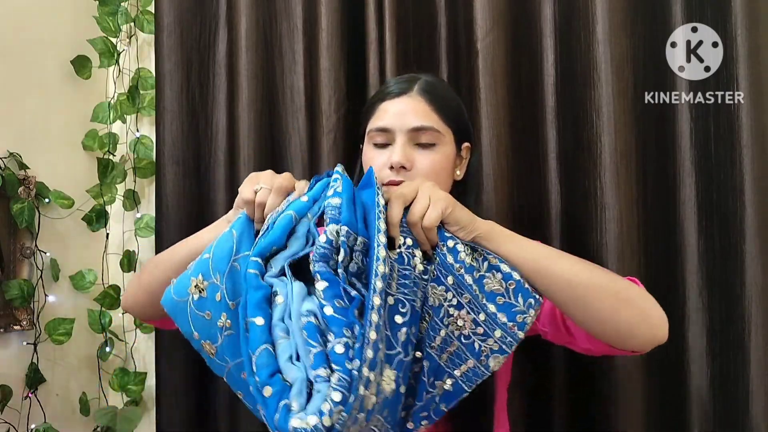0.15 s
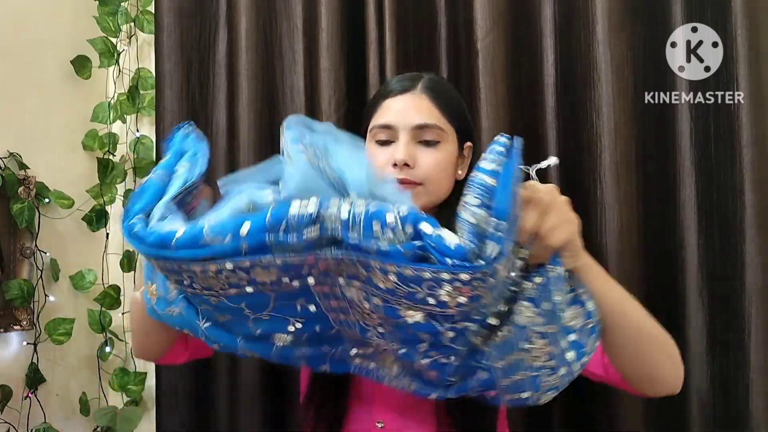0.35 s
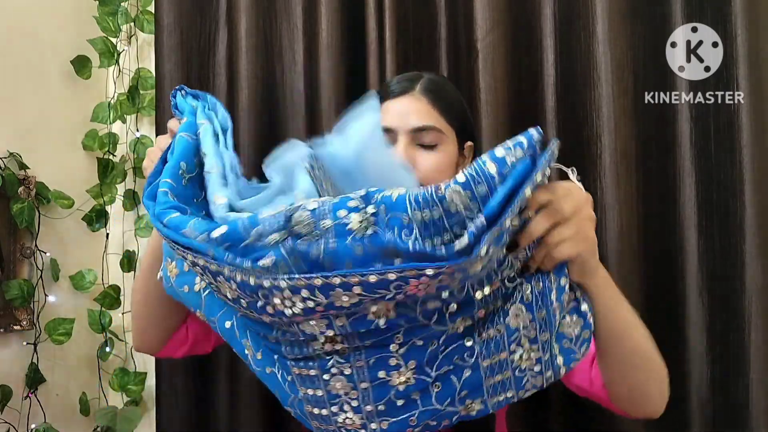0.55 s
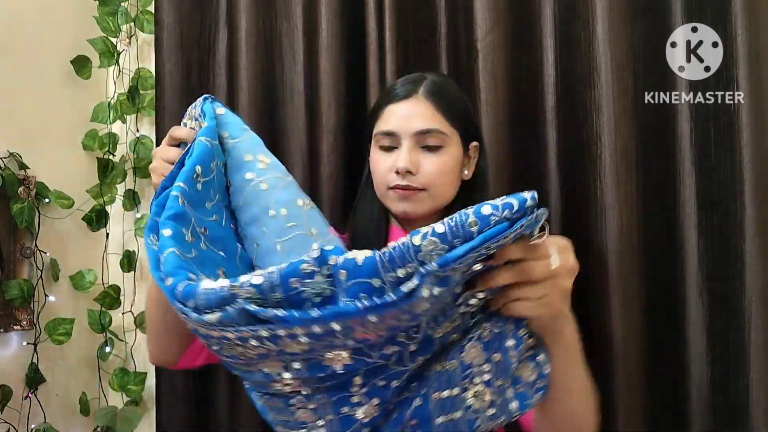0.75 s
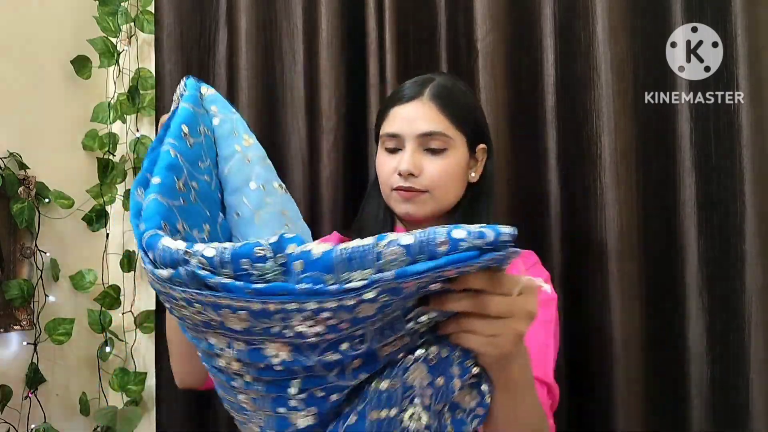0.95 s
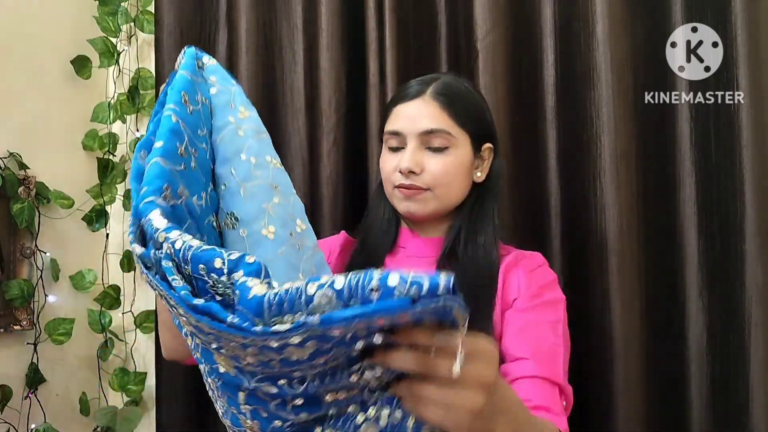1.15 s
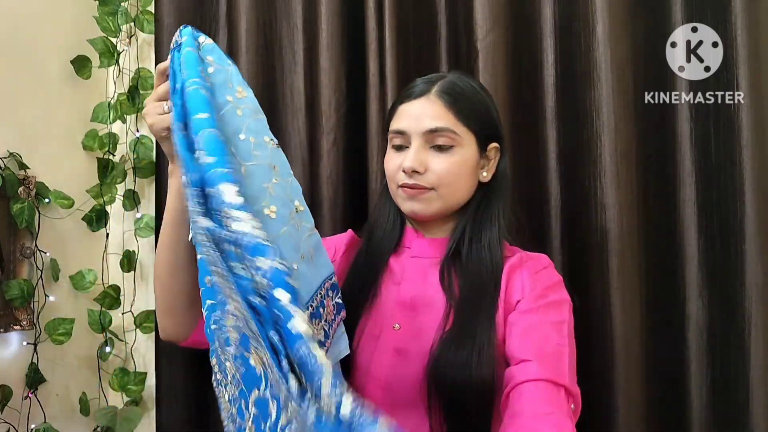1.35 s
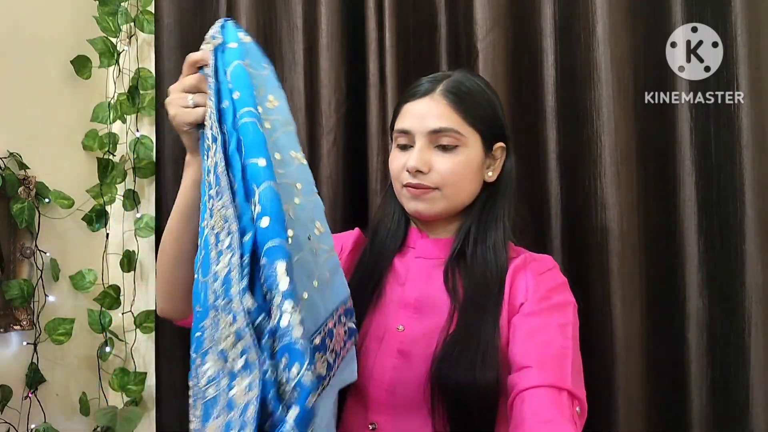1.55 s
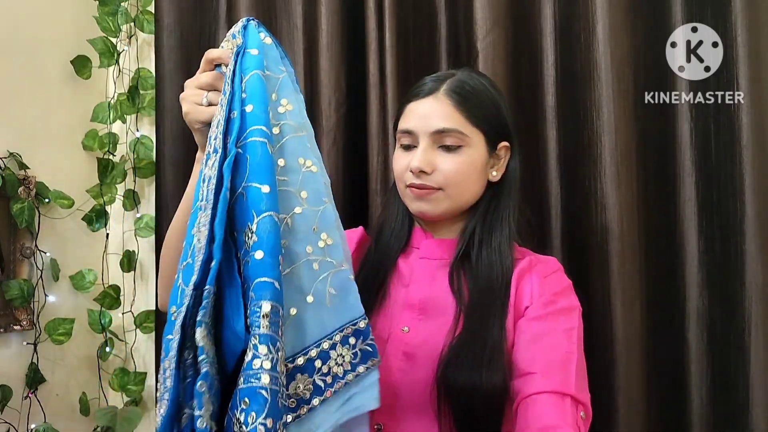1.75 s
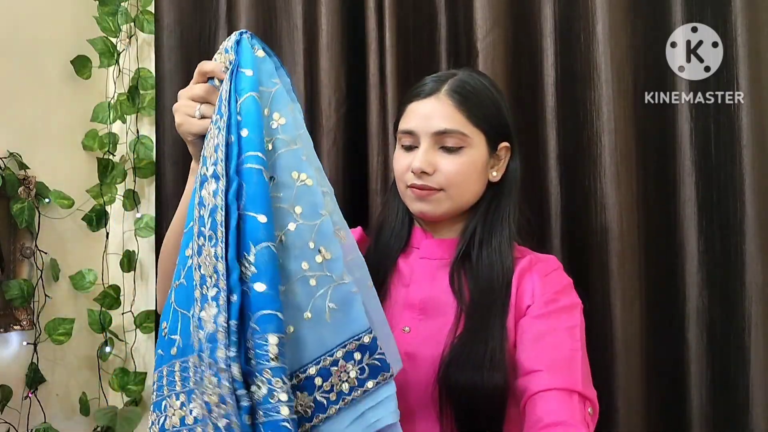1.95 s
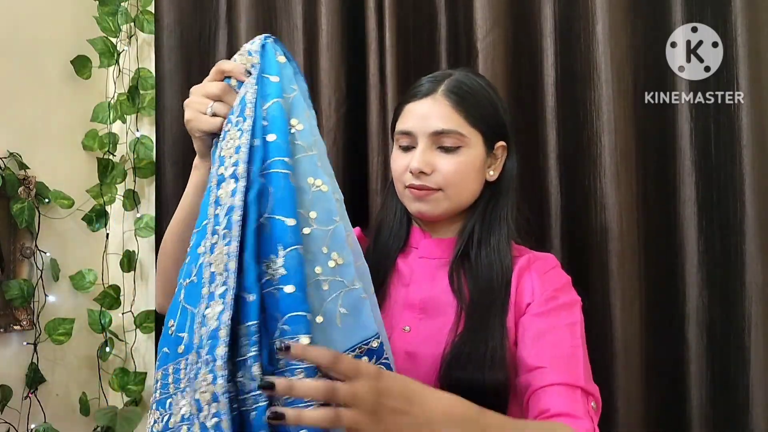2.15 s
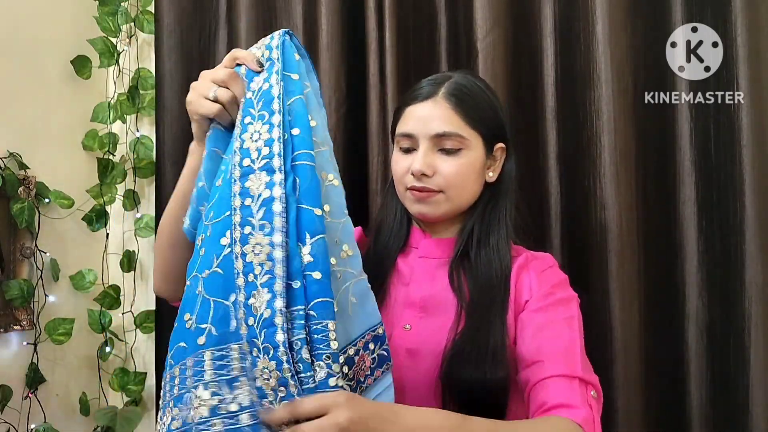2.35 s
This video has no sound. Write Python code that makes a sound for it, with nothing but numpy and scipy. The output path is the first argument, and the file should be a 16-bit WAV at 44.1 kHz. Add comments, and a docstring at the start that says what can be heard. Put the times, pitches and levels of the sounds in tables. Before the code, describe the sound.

A folded sequined fabric is shaken out sharply indoors, crackling brightly before soft handling rustles

```python
"""A folded, sequined cloth is shaken open in a small room.
It snaps taut with a puff of air, then its layers slide apart in a broad swish: the weave rubs in dense
tiny slips, creases crinkle, sequins sizzle and tick. Then it is lowered and smoothed by hand, with
softer rustles and a few pats. Each cloth sound is a run of impulses, filtered to its colour; near
echoes and a short diffuse tail answer it, over a bed of quiet room noise."""
import sys
import numpy as np
from scipy import signal
from scipy.fft import rfft, irfft, next_fast_len
from scipy.io import wavfile

SR = 44100
rng = np.random.default_rng(int(sys.argv[2]) if len(sys.argv) > 2 else 0)


def master_out(mix):
    """Clip the mix to full scale and print it as 16-bit PCM to the path in sys.argv[1]."""
    frames = np.transpose(np.atleast_2d(mix))
    ceiling = np.clip(frames, -1, 1)
    pcm = np.round(ceiling * 32767).astype(np.int16)
    wavfile.write(sys.argv[1], SR, pcm)


N = 105840  # samples, 2.4 s
SIZE = next_fast_len(N + SR)  # FFT length with space for the tail
HZ = np.maximum(np.arange(SIZE // 2 + 1) * SR / SIZE, 1)
T = np.arange(N) / SR

# Source levels are relative: each layer's *_GAIN_DB is added. Spectra give shape only.
# how hard the cloth moves: [t/s, weave level/dB, crease level/dB, sequin level/dB]
MOTION = [(0, -78, -78, -77), (0.211, -76, -70, -72), (0.233, -48.5, -69.5, -57), (0.264, -27, -46, -43),
          (0.286, -32, -31.5, -35.5), (.335, -45.5, -32.5, -38), (0.373, -42, -29.5, -34),
          (.42, -46.5, -27, -34.5), (0.461, -47, -34, -22), (0.499, -42.5, -25.5, -36),
          (.535, -35.5, -25.5, -41.5), (.582, -33.5, -22.5, -31.5), (.605, -49, -38, -61),
          (.64, -57.5, -38, -52), (0.673, -50, -47, -37), (0.709, -57, -48.5, -49.5),
          (.752, -49, -47, -39.5), (.77, -58, -46, -52), (0.789, -57.5, -40.5, -45),
          (.812, -59.5, -53, -48.5), (.842, -57, -46, -42.5), (0.899, -62, -59, -59),
          (.948, -63.5, -62, -54), (.966, -60, -62, -46), (1.004, -67.5, -58, -59), (1.03, -69.5, -63, -86),
          (1.15, -76, -68, -62), (1.18, -71, -58, -60), (1.25, -71.5, -74, -60.5), (1.34, -67, -72, -59),
          (1.47, -66, -83, -60), (1.51, -64.5, -65, -53), (1.54, -59.5, -73, -52), (1.59, -68, -75, -59),
          (1.685, -62, -56, -56), (1.714, -61, -71, -57.5), (1.727, -59, -49, -40),
          (1.77, -66.5, -60, -57.5), (1.795, -58.5, -56.5, -48), (1.85, -58.5, -45.5, -57),
          (1.889, -58, -42, -39.5), (1.915, -61, -49.5, -63), (1.952, -66, -64, -62),
          (1.967, -67.5, -58.5, -49), (2.035, -67, -76, -61), (2.075, -71.5, -76, -84),
          (2.14, -72.5, -83, -78), (2.21, -71, -67, -67), (2.24, -75, -83, -85), (2.327, -72.5, -79, -70),
          (2.339, -63.5, -66, -58.5), (2.4, -58.5, -42.5, -50)]
# colour of the rubbing weave: [f/Hz, level/dB]
WEAVE_SPECTRUM = [(40, -37), (100, -25), (200, -15), (430, -4.5), (700, -3.5), (1100, -2), (1500, -2),
                  (1900, -7.5), (2500, -3), (4000, -4.5), (8000, -24), (9500, -56.5), (16000, -39.5)]
SLIPS_PER_S, SLIP_SPREAD_DB, WEAVE_GAIN_DB = 6000, 3.0, 4.5
# colour of the crinkling creases: [f/Hz, level/dB]
CREASE_SPECTRUM = [(200, -37), (1200, -26.5), (1950, -15.5), (2400, -3), (3200, -7.5), (3900, -2.5),
                   (4700, -8), (6000, -11.5), (8500, -41), (9500, -36), (16000, -58)]
CRINKLES_PER_S, CRINKLE_SPREAD_DB, CREASE_GAIN_DB = 4000, 1, -3.5
# colour of the sizzling sequins: [f/Hz, level/dB]
SEQUIN_SPECTRUM = [(300, -21), (2000, -41), (3500, -1), (4600, -6.5), (5800, 2), (6500, 1.5), (7100, 5),
                   (7800, -7), (8700, -11.5), (9450, -46.5), (10200, -22.5), (11100, -27.5), (11900, -20),
                   (12800, -31.5), (15500, -23)]
SCRAPES_PER_S, SCRAPE_SPREAD_DB, SEQUIN_GAIN_DB = 2600, 4, -0.5
FLUTTER_DB, FLUTTER_HZ = 2.5, 69.69  # depth of the clumping, new random values per second

# the layers snap taut: [t/s, level/dB]
SNAPS = [(.238, 3.5), (.2522, -6), (.2565, -12.5)]
# colour of the snap: [f/Hz, level/dB]
SNAP_SPECTRUM = [(30, -35), (60, -28), (120, -19), (200, -11.5), (400, 7), (1000, 7), (1500, 8),
                 (1900, 4.5), (2600, 7), (3800, 5), (5000, -3), (8000, -7), (10000, -31.5), (16000, -33)]
SNAP_GAIN_DB, SNAP_ROOM_DB = 6.5, 8
# single sequins click: [t/s, level/dB]
TICKS = [(.156, -57), (.2235, -47), (.3075, -23), (.385, -23), (.4545, -21), (.562, -23), (.575, -21),
         (.6695, -28), (.684, -26), (.757, -30), (.8335, -25), (.955, -27), (.991, -35), (1.107, -38),
         (1.509, -45), (1.7205, -31), (1.7245, -35), (1.8715, -33), (1.8865, -32), (1.9585, -35)]
# colour of a sequin's click: [f/Hz, level/dB]
TICK_SPECTRUM = [(300, -30), (2000, -22), (3800, -6), (4800, -5), (5800, -1), (7200, 0), (8500, -8),
                 (9600, -31), (16000, -35)]
TICK_GAIN_DB, TICK_ROOM_DB = 9, -3.5
# fingers pat and pluck the folds: [t/s, level/dB]
PATS = [(1.16, -43), (1.6555, -41), (1.7935, -38), (2.049, -46), (2.189, -40), (2.3355, -42)]
# colour of a pat: [f/Hz, level/dB]
PAT_SPECTRUM = [(60, -22), (200, -9), (500, -3), (1000, 0), (1900, -7), (2600, -2), (4000, -4), (7000, -10),
                (9500, -30), (16000, -34)]
PAT_GAIN_DB, PAT_ROOM_DB = 6, -2
# the billowing cloth pushes puffs of air: [t/s, level/dB, f/Hz, decay/s]
PUFFS = [(0.239, -36.5, 140, 0.01), (0.766, -51, 74.4, 0.0084)]
# colour of the still room: [f/Hz, level/dB]
AIR_SPECTRUM = [(20, 9), (50, 6.5), (150, 5.5), (300, 1.5), (1000, -8.5), (1900, -16.5), (3600, -16.5),
                (5000, -26), (7200, -19), (9000, -18), (15500, -18.5)]
AIR_GAIN_DB = -69

# the cloth drifts from slightly left to slightly right: [t/s, left minus right level/dB]
CLOTH_PAN = [(.25, 1), (.6, .5), (1.2, -1), (2.3, -1.3)]
LEFT_LAG_S = 0.00013
LAG_SCATTER_S = 0.00011  # the cloth is wide, so its patches reach the two ears with different lags
# nearby surfaces, relative to the tail before ECHO_DB: [delay/s, level/dB]
ECHOES = [(.0043, -1), (.009, -0.5)]
ECHO_SCATTER = .35  # share by which the echo delays differ across the cloth
# *_ROOM_DB is the tail level against the direct sound; the onset is a time constant
ECHO_DB, ROOM_DB, ROOM_ONSET_S = -6, -1.5, 0.0018
# time for the tail to fall by 60 dB: [f/Hz, T60/s]
ROOM_T60 = [(100, 0.54), (400, 0.28), (1500, 0.22), (4000, 0.16), (10000, 0.54)]
# how alike diffuse sound is in the two ears: [f/Hz, likeness from 0 to 1]
LIKENESS = [(60, 0), (200, 0.44), (450, 0.35), (900, 0), (2000, 0), (10000, 0)]
# tone of the left microphone against the right: [f/Hz, left minus right level/dB]
MIC_BALANCE = [(100, 4.5), (450, -.5), (1500, 1), (3500, -0.5), (4600, -1), (5700, -7), (6900, -7),
               (7600, -12.5), (8400, 11.5), (10000, 1), (15000, -2)]
RUMBLE_CUT_HZ, TREBLE_CUT_HZ = 58, 15600


def rustle(count):
    """Several patches of moving cloth rub, crinkle and sizzle, each from its own spot in the room."""
    _, weave_db, crease_db, sequin_db = np.transpose(MOTION)
    patches = weave(weave_db, count) + creases(crease_db, count) + sequins(sequin_db, count)
    sides = np.linspace(-1, 1, count)
    return sum(in_room(patch, ROOM_DB, side, 1 + ECHO_SCATTER * side)
               for patch, side in zip(patches, sides))


def weave(level_db, count):
    """Threads catch and let go in dense tiny slips: the body of the swish."""
    slips = grains(SLIPS_PER_S, SLIP_SPREAD_DB, count)
    return colour(slips * motion_gain(level_db + WEAVE_GAIN_DB), WEAVE_SPECTRUM)


def creases(level_db, count):
    """Folds buckle in a run of small crinkles of nearly even size."""
    crinkles = grains(CRINKLES_PER_S, CRINKLE_SPREAD_DB, count)
    return colour(crinkles * motion_gain(level_db + CREASE_GAIN_DB), CREASE_SPECTRUM)


def sequins(level_db, count):
    """Sequins scrape in sparser, more uneven grains: the bright sizzle."""
    scrapes = grains(SCRAPES_PER_S, SCRAPE_SPREAD_DB, count)
    return colour(scrapes * motion_gain(level_db + SEQUIN_GAIN_DB), SEQUIN_SPECTRUM)


def motion_gain(level_db):
    """Follow one layer of the cloth's motion as a gain over time."""
    return from_db(np.interp(T, np.transpose(MOTION)[0], level_db))


def grains(per_s, spread_db, count):
    """Random impulses of uneven size that swell in clumps, dealt out to the patches; rms 1 in all."""
    flutter = np.interp(T * FLUTTER_HZ, np.arange(N), rng.standard_normal(N))
    sizes = from_db(spread_db * np.minimum(rng.exponential(1, N), 4)) * rng.choice([-1, 1], N)
    happens = rng.random(N) < per_s / SR
    slips = rms_one(sizes * happens * from_db(FLUTTER_DB * flutter))
    patch_of_slip = rng.integers(0, count, N)
    return slips * (patch_of_slip == np.arange(count)[:, None])


def snap():
    """Layers pull taut in a tight group of impulses, heard as one snap."""
    return in_room(from_db(SNAP_GAIN_DB) * colour(clicks(SNAPS), SNAP_SPECTRUM), SNAP_ROOM_DB)


def ticks():
    """Single sequins click: one bright filtered impulse each."""
    return in_room(from_db(TICK_GAIN_DB) * colour(clicks(TICKS), TICK_SPECTRUM), TICK_ROOM_DB)


def pats():
    """Fingers pat and pluck the folds: one duller filtered impulse each."""
    return in_room(from_db(PAT_GAIN_DB) * colour(clicks(PATS), PAT_SPECTRUM), PAT_ROOM_DB)


def clicks(rows):
    """One impulse for each row of time and level."""
    out = np.zeros(N)
    for s, db in rows:
        out[int(s * SR)] += from_db(db)
    return out


def puffs():
    """Each billow gives the air one low push: a sine that dies at once."""
    out = 0
    for s, db, hz, decay_s in PUFFS:
        age = np.maximum(T - s, 0)
        out = out + from_db(db) * np.sin(2 * np.pi * hz * age) * np.exp(-age / decay_s)
    return out


def room_air():
    """The still room: steady diffuse noise, strongest in the bass."""
    return from_db(AIR_GAIN_DB) * colour(diffuse(N), AIR_SPECTRUM)


def in_room(x, room_db, side=0, reach=1):
    """Direct sound, near echoes and tail of one spot (side -1 to 1; reach scales the echo delays)."""
    def delay(left_s, right_s):
        return np.exp(-2j * np.pi * HZ * np.array([[left_s], [right_s]]))

    direct = delay(LEFT_LAG_S + side * LAG_SCATTER_S, 0)
    echoes = 0
    for s, db in ECHOES:
        left_s = s * reach * rng.uniform(.9, 1.1)
        echoes = echoes + from_db(db + ECHO_DB) * delay(left_s, s * reach)
    path = direct + from_db(room_db) * (rfft(room_tail(), SIZE) + echoes)
    path = path / np.sqrt(np.mean(abs(path) ** 2))  # the room leaves the mean power gain at 1
    return irfft(rfft(x, SIZE) * path, SIZE)[:, :N]


def room_tail():
    """Half a second of diffuse reverberation that dies at its own pace in each band; unit energy."""
    t = T[:SR // 2]
    noise = rfft(diffuse(len(t)))
    log_hz = np.log(np.linspace(1, SR / 2, noise.shape[1]))
    centres = np.log([hz for hz, _ in ROOM_T60])
    tail = 0
    for share, (_, t60) in zip(np.eye(len(centres)), ROOM_T60):
        band = irfft(noise * np.interp(log_hz, centres, share))  # crossfades into its neighbours
        tail = tail + band * from_db(-60 * t / t60)
    return rms_one(tail * (1 - np.exp(-t / ROOM_ONSET_S))) / np.sqrt(len(t))


def diffuse(size):
    """White noise from all around: partly alike in both ears in the low mids, unlike elsewhere."""
    mid, side = rfft(rng.standard_normal((2, size)))
    alike = np.clip(at_hz(LIKENESS, np.linspace(1, SR / 2, len(mid))), -1, 1)
    ears = np.sqrt(1 + alike) * mid + np.sqrt(1 - alike) * side * [[1], [-1]]
    return rms_one(irfft(ears, size))


def colour(x, spectrum):
    """Causal (minimum-phase) filter with this spectrum and unit power gain."""
    cepstrum = irfft(np.log(rms_one(from_db(at_hz(spectrum)))), SIZE)
    cepstrum[1:SIZE // 2] *= 2  # fold the cepstrum forward in time
    cepstrum[SIZE // 2 + 1:] = 0
    return irfft(rfft(x, SIZE) * np.exp(rfft(cepstrum)), SIZE)[..., :N]


def at_hz(points, hz=HZ):
    """Read a table on a log-frequency axis."""
    f, value = np.transpose(points)
    return np.interp(np.log(hz), np.log(f), value)


def from_db(db):
    """Decibels to gain."""
    return 10 ** (np.asarray(db) / 20)


def rms_one(x):
    """Scale to rms 1."""
    return x / np.sqrt(np.mean(x ** 2) + 1e-20)


def scene():
    """The cloth's rustle, snap, ticks and pats drift together; puffs and room air stay put."""
    cloth = rustle(count=4) + snap() + ticks() + pats()
    pan_db = np.interp(T, *np.transpose(CLOTH_PAN))
    pan = from_db(pan_db * np.array([[.5], [-.5]]))
    return pan * cloth + puffs() + room_air()


def record(dry):
    """Two microphones differ in tone band by band; rumble and the top are cut."""
    mics = from_db(at_hz(MIC_BALANCE) * np.array([[.5], [-.5]]))
    mics = mics / np.sqrt(np.mean(mics ** 2, axis=0))  # same summed power gain at every frequency
    heard = irfft(rfft(dry, SIZE) * mics, SIZE)[:, :N]
    rumble_cut = signal.butter(2, RUMBLE_CUT_HZ, "high", fs=SR, output="sos")
    treble_cut = signal.ellip(12, .2, 70, TREBLE_CUT_HZ, fs=SR, output="sos")
    return signal.sosfilt(treble_cut, signal.sosfilt(rumble_cut, heard))


dry = scene()
out = record(dry)
master_out(out)
```